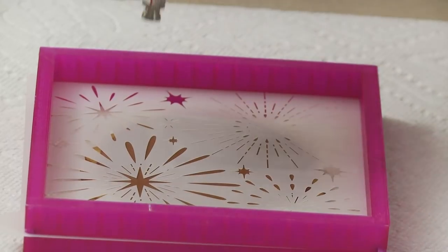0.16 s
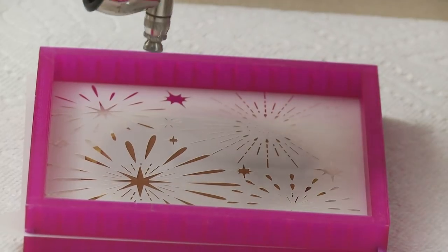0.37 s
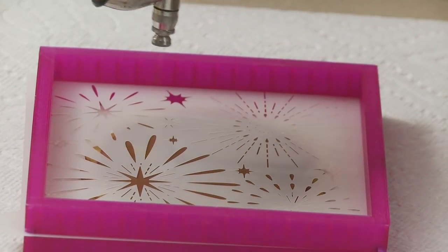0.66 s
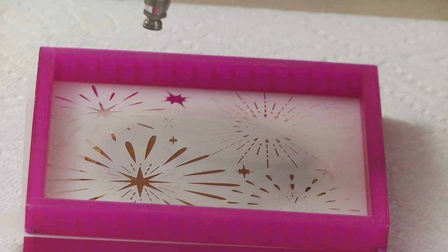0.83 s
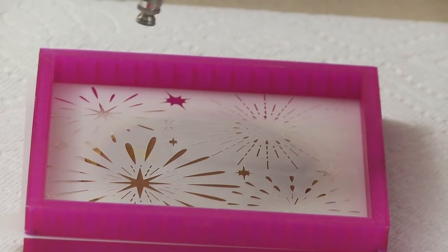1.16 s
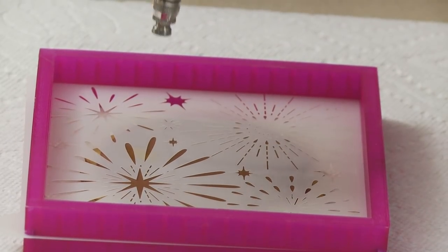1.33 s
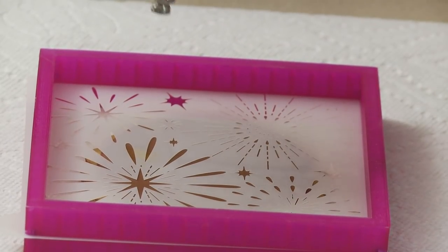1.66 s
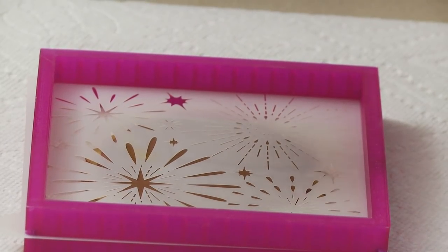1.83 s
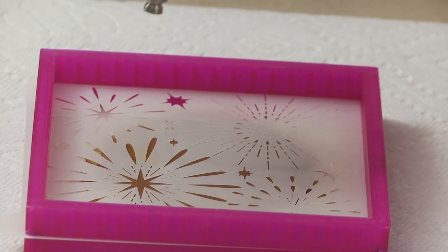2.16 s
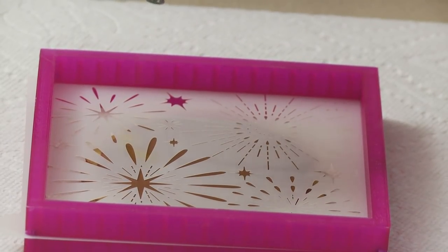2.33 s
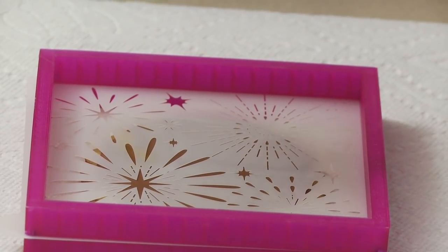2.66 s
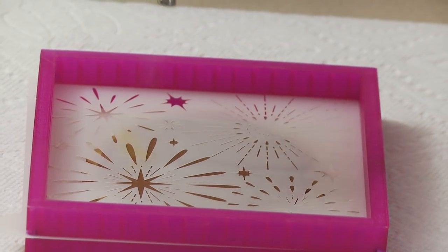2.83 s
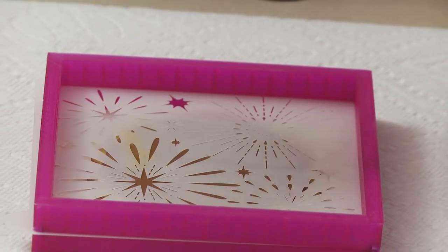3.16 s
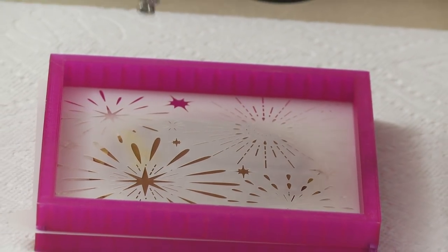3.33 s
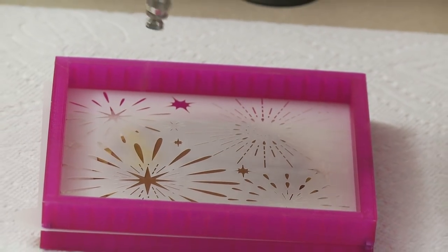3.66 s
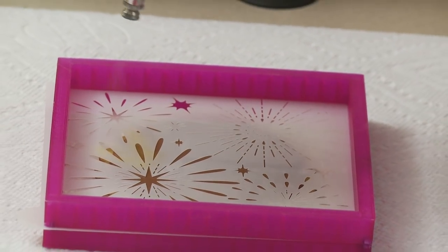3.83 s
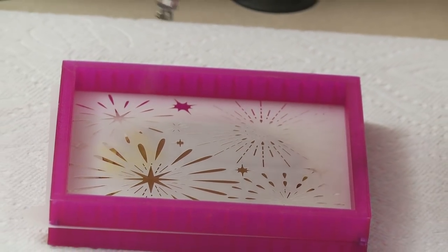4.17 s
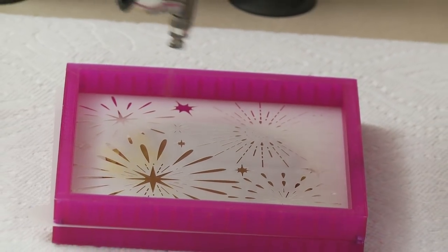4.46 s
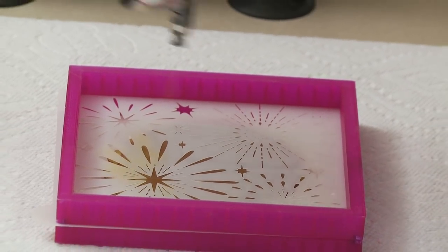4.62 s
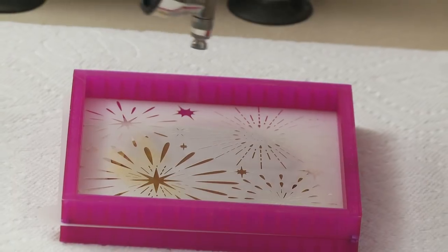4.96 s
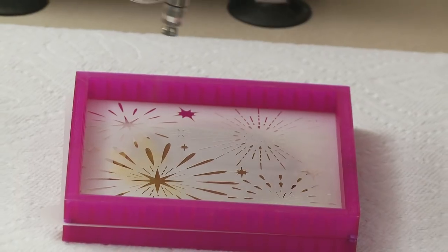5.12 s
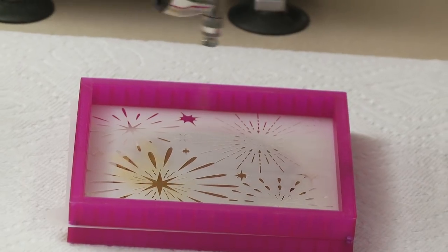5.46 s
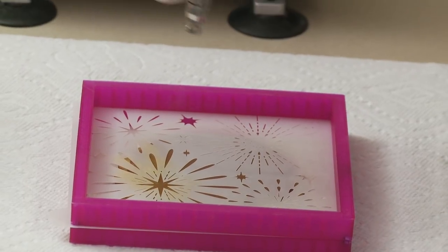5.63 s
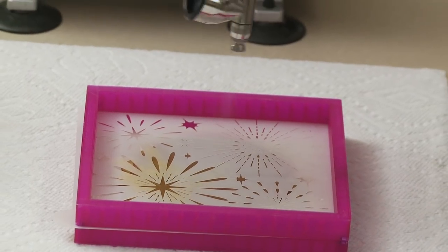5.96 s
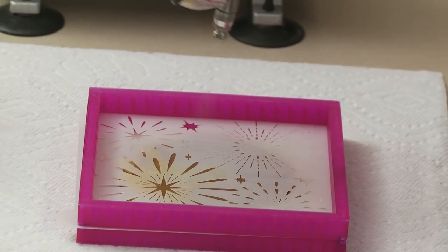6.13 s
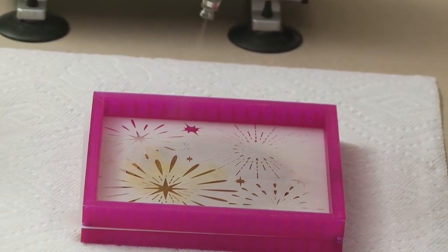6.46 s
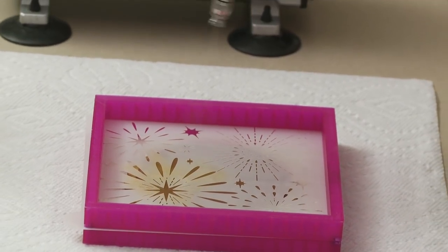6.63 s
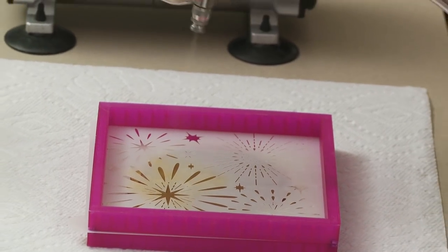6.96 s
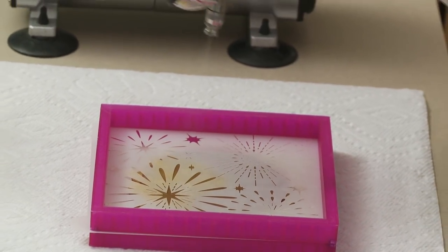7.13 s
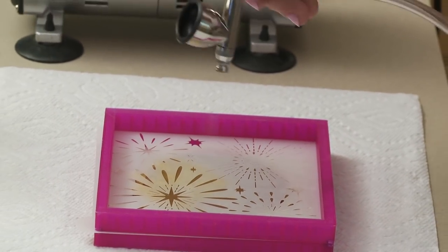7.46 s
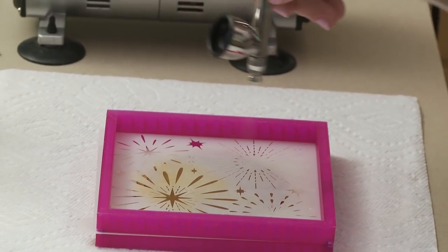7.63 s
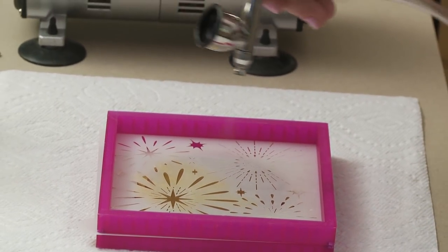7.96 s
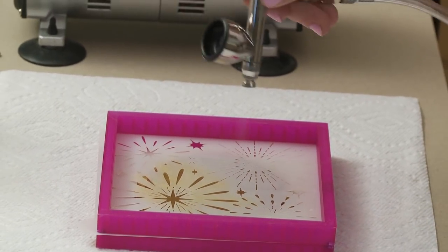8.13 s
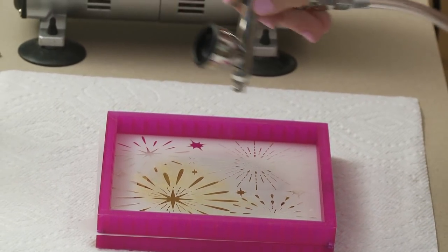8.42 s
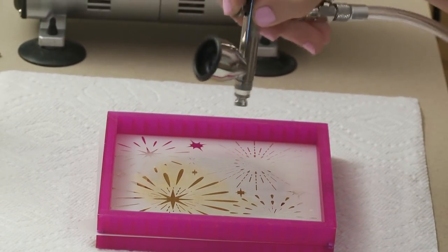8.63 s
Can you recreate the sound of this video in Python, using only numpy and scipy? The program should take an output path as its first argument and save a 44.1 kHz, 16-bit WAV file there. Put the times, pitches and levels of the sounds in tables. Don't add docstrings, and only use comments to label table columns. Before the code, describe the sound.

A small air compressor chugs and hums steadily on a counter while an airbrush hisses close by, its jet swelling as it sweeps a plastic tray.

```python
import sys
import numpy as np
from scipy import signal
from scipy.fft import rfft, irfft, next_fast_len
from scipy.io import wavfile
from scipy.ndimage import uniform_filter1d, map_coordinates

SR = 44100
rng = np.random.default_rng(int(sys.argv[2]) if len(sys.argv) > 2 else 0)


def bounce(signal):
    frames = np.transpose(np.atleast_2d(signal))
    limited = np.clip(frames, -1, 1)
    pcm = np.round(limited * 32767).astype(np.int16)
    wavfile.write(sys.argv[1], SR, pcm)


def ratio(d):
    e = np.asarray(d, float) / 20
    return 10 ** e


N = 387638

SHAFT_HZ = 28.24
VALVE_S = .005
SQUEAL_HZ = 7510


def unit(x):
    return x / np.sqrt(np.mean(x ** 2) + 1e-20)


def along(points, hz):
    f, v = np.transpose(points)
    return np.interp(np.log(hz + 1), np.log(f + 1), v)


def curves(rows):
    s, *cols = np.transpose(rows)
    return [np.interp(np.arange(N) / SR, s, c) for c in cols]


def wobble(rate):
    knots = rng.standard_normal(int(N * rate / SR) + 4)
    return map_coordinates(knots, [np.arange(N) * rate / SR])


def add_db(a_db, b_db):
    return 10 * np.log10(ratio(2 * a_db) + ratio(2 * b_db))


def filtered(x, response):
    m = 2 * next_fast_len(N // 2 + SR // 4)
    return irfft(rfft(x, m) * response(np.fft.rfftfreq(m, 1 / SR)), m)[..., :N]


def causal(db, share, slant):
    cepstrum = irfft(np.log(ratio(db) + 1e-9))
    half = len(cepstrum) // 2
    cepstrum[1:half] *= 2
    cepstrum[half + 1:] = 0
    log = rfft(cepstrum)
    khz = np.linspace(0, SR / 2000, half + 1)
    delay_phase = np.pi * 1000 * slant * khz ** 2
    return np.exp(log.real + 1j * share * log.imag - 1j * delay_phase)


def hiss(spectrum, patchy_db):
    z = signal.stft(rng.standard_normal(N + 512), nperseg=512)[2]
    field = uniform_filter1d(uniform_filter1d(rng.standard_normal(z.shape), 5, 0), 9, 1)
    x = signal.istft(z * ratio(patchy_db * unit(field)), nperseg=512)[1][:N]
    closed = [(spectrum[0][0] / 2, -120), *spectrum, (spectrum[-1][0] * 2, -120)]
    return unit(filtered(x, lambda hz: ratio(along(closed, hz))))


def narrow(centre_hz, width_hz):
    slow = filtered(rng.standard_normal((2, N)), lambda hz: 1 / (1 + (2 * hz / width_hz) ** 2))
    phase = 2 * np.pi * np.cumsum(centre_hz) / SR
    return unit(slow[0] * np.cos(phase) + slow[1] * np.sin(phase))


def bounced(x, ms, strength):
    late = map_coordinates(x, [np.arange(N) - ms * SR / 1000])
    return (x + strength * late) / np.sqrt(1 + strength ** 2)


def strikes(turns, angle, scatter_db):
    at = np.interp(np.arange(int(turns[-1] - angle) + 1) + angle, turns, np.arange(N))
    size = ratio(scatter_db * rng.standard_normal(len(at)))
    whole = at.astype(int)
    first = np.bincount(whole, size * (1 - at % 1), N + 1)
    second = np.bincount(whole + 1, size * (at % 1), N + 1)
    return (first + second)[:N]


def passes(rows, rest_db):
    t = np.arange(0, N / SR, .002)
    squareness = 2.42
    swells = 0
    for s, length, db in rows:
        swells = swells + ratio(2 * db) * np.exp(-np.abs(2 * (t - s) / length) ** squareness)
    return 10 * np.log10(ratio(2 * rest_db) + np.interp(np.arange(N) / SR, t, swells))


def kitchen(x):
    # pitch_hz, decay_s
    die_away = [(200, 0.15), (2500, 0.33), (12000, 0.28)]
    hz, t, z = signal.stft(rng.standard_normal(SR // 2), SR, nperseg=256)
    decay = ratio(-60 * t / along(die_away, hz)[:, None])
    tail = signal.istft(z * decay, SR, nperseg=256)[1]
    return signal.fftconvolve(np.pad(x, (300, 0)), tail / np.linalg.norm(tail))[:N]


def pistons(turns, pressure):
    # shaft_order, level_db
    opposed_orders = [(1, -67.7), (3, -63.3), (5, -55.6), (7, -58.7), (9, -61.8), (11, -63.4), (13, -59.9),
                      (15, -67.4), (17, -62.5), (19, -66.8), (21, -66.4), (23, -64.0), (25, -58.3),
                      (27, -72.2), (29, -62.8), (31, -63.9), (33, -63.0)]
    # shaft_order, level_db
    shared_orders = [(2, -62), (4, -65), (6, -68), (8, -81), (10, -108), (12, -70), (14, -74.5), (16, -81),
                     (18, -69.5), (20, -67), (22, -98), (24, -70.5), (26, -83), (28, -73.5), (30, -67.5),
                     (32, -65), (34, -56)]
    opposed = strikes(turns, .15, scatter_db=.7) - strikes(turns, .65, scatter_db=.7)
    shared = strikes(2 * turns, .75, scatter_db=.4)

    def frame(orders):
        peaks = [(k * SHAFT_HZ, db) for k, db in orders]
        points = [(5, -90), *peaks, (1100, -90), (3000, -130)]
        return lambda hz: causal(along(points, hz), share=0.57, slant=0.00376)

    def tank(f):
        return ratio(-60) * (1j * f * 300 / (620 ** 2 - f * f + 1j * f * 300)) ** 2

    thumps = filtered(opposed, frame(opposed_orders)) + filtered(shared, frame(shared_orders[:-1]))
    thumps = thumps + pressure * filtered(shared, tank)
    return thumps * SR / SHAFT_HZ / np.sqrt(8)


def housing(turns, tone_db, pressure):
    beat_hz, slip_hz = 7.075, 148.298
    t = np.arange(N) / SR
    beat = 2 * np.pi * (beat_hz * t + .32)
    swell = 1 + .11 * np.cos(beat) + .1 * np.cos(2 * beat - 3.2) + .04 * wobble(28)
    sway = 0.26 * np.sin(beat + 0.73) + 0.16 * np.sin(2 * beat + 1.3)
    loose = .02 + .6 * pressure
    starts = (-.3, .27, -.36, .27, -.3)
    levels_db = (-62 + 7 * pressure, *tone_db, -62 + 9 * pressure)
    tone = 0
    for order, start, db in zip(range(34, 39), starts, levels_db):
        phase = 2 * np.pi * (order * turns + start) + sway + loose * wobble(18)
        tone = tone + ratio(db) * np.cos(phase)
    slip = ratio(-57.0) * np.cos(2 * np.pi * (slip_hz * t + 0.31))
    return np.sqrt(2) * (swell * tone + slip)


def valves(turns, pressure):
    # pitch_hz, width_hz, level_db
    plate_modes = [(1289, 43, -2), (1570, 240, -1.5), (1753, 44, 5), (2160, 72, -7.5), (2540, 180, -21)]
    # pitch_hz, level_db per Hz
    tick_spectrum = [(1590, -23), (2700, -8), (2760, 2), (3350, -12), (4580, -3), (6260, -13), (11300, 2.5),
                     (13300, -12), (16000, -40)]
    # pitch_hz, level_db per Hz
    rattle_spectrum = [(12, 12), (40, -4.5), (100, -7.5), (300, -14.5), (880, -11.5), (1020, 0),
                       (1090, -4.5), (1200, -14), (1700, -7), (1900, -19.5), (2600, -28), (4000, -72)]
    blows = strikes(turns, .36, scatter_db=1.2)
    blows = blows + .5 * strikes(turns, .735, scatter_db=1.6)
    blows = blows - .45 * strikes(turns, .59, scatter_db=1.6)

    def padded_plate(f):
        ring = 0
        for k, (c, w, db) in enumerate(plate_modes):
            ring = ring + (-1) ** k * ratio(db) * 1j * f * w / (c * c - f * f + 1j * f * w)
        return ring / (1 + 1j * f / 3000) ** 3

    leak = 0.099 + ratio(-60 * ((turns - .17) % 1) / .7) + 0.33 * ratio(-60 * ((turns - .4) % 1) / 1.1)
    throb = 1 + 0.19 * np.cos(4 * np.pi * (turns - .2))
    clack = ratio(-54.5 + 3.7 * pressure) * unit(filtered(blows, padded_plate))
    tick = ratio(-64.5) * unit(leak * hiss(tick_spectrum, patchy_db=1))
    rattle = ratio(-51.0) * throb * hiss(rattle_spectrum, patchy_db=.5)
    return clack + tick + rattle


def puffs():
    # start_s, peak_db, sign
    steps = [
        (1.895, -48, -1),
        (2.132, -33, 1),
    ]
    t = np.arange(N) / SR
    swings = 0
    for s, db, sign in steps:
        swing = np.sin(2 * np.pi * 36 * (t - s)) * ratio(-60 * np.abs(t - s) / .16)
        swings = swings + sign * ratio(db) * (t > s) * swing
    return swings


def trigger():
    shut_s, open_s = 1.888, 2.131
    t = np.arange(N) / SR
    return np.clip(np.maximum(shut_s - t, t - open_s) / VALVE_S + .5, 0, 1) ** 2


def needle():
    first_s, dry_db = 0.052, -9
    stutter_s, stutter_length_s, stutter_db = .074, .012, -6
    t = np.arange(N) / SR
    still_dry = np.clip((first_s - t) / VALVE_S + .5, 0, 1)
    catch = np.exp(-(2 * (t - stutter_s) / stutter_length_s) ** 2)
    return ratio(dry_db * still_dry + stutter_db * catch)


def droplets():
    # start_s, peak_db
    bursts = [(.1143, -21), (.1165, -23), (.1257, -23), (.129, -26)]
    t = np.arange(N) / SR
    pops = 0
    for s, db in bursts:
        pops = pops + ratio(db) * np.exp(-((t - s) / .00012) ** 2) * np.cos(2 * np.pi * SQUEAL_HZ * (t - s))
    return -pops


def wet_tip():
    # centre_s, length_s, level_db
    squeals = [(.118, 0.049, -36.5), (.15, 0.074, -40)]
    return ratio(passes(squeals, -120)) * narrow(np.full(N, SQUEAL_HZ), width_hz=1400) + droplets()


def gurgle():
    # time_s, pitch_hz, level_db
    rising = [(.03, 1100, -90), (.05, 1150, -51), (.1, 1250, -48), (.16, 1600, -52), (.3, 2100, -52),
              (.45, 2200, -70)]
    spit_hz, spit_db = curves(rising)
    return ratio(spit_db) * narrow(spit_hz, width_hz=900)


def drifting_mist():
    # pitch_hz, level_db per Hz
    mist_spectrum = [(2400, -13), (3900, -0.5), (5000, -11), (6800, -4.5), (8500, 3)]
    return ratio(-60 + wobble(5)) * hiss(mist_spectrum, patchy_db=2.5)


def tray_splash(splash_db, flutter):
    # pitch_hz, level_db per Hz
    splash_spectrum = [(300, -22), (600, -11.5), (780, -12), (1500, -9), (2050, -6), (2480, -14.5),
                       (2800, -4.5), (3300, -3), (3900, -6), (4080, -12.5), (4280, -2), (4600, 0.5),
                       (5600, 0), (6400, -4), (7000, -21), (9000, -12)]
    level_db = splash_db + 0.98 * wobble(14) + flutter + 0.42 * wobble(120)
    return ratio(level_db) * hiss(splash_spectrum, patchy_db=0.68)


def needle_cap():
    # time_s, pitch_hz, level_db
    ringing = [(0, 10600, -60), (.12, 10500, -44), (.33, 10810, -46), (.45, 10700, -68), (3, 11250, -60),
               (3.3, 11030, -52), (4.2, 10600, -52), (5.6, 10160, -56), (7, 9670, -58.5), (8.79, 9930, -62)]
    cap_hz, cap_db = curves(ringing)
    return ratio(cap_db + 2 * wobble(8)) * narrow(cap_hz + 120 * wobble(5), width_hz=700)


def nozzle(rest_db, facing_db, counter_ms, splash_db):
    # pitch_hz, level_db per Hz
    middle_spectrum = [(2200, -34), (3000, -22), (4500, -12), (6500, -2), (8000, 0), (9500, 0), (11000, -3),
                       (12500, -12), (14000, -30)]
    # pitch_hz, level_db per Hz
    top_spectrum = [(9500, -30), (10600, -8), (13000, -5), (13800, 0), (15800, 0), (17000, 0)]
    # centre_s, length_s, level_db
    clearings = [(.12, 0.045, -36.5), (.24, 0.16, -45), (4.75, 0.072, -46), (6.2, .05, -50)]
    # centre_s, length_s, whistle_db
    wrist_turns = [(2.17, .1, -46), (2.89, .12, -44), (4.21, .14, -39), (4.43, .09, -39), (4.62, .22, -40),
                   (4.94, 0.13, -41), (5.21, 0.14, -42.5), (6.07, 0.07, -46), (6.67, 0.12, -42),
                   (7.15, .1, -42), (8.1, .16, -45), (8.33, 0.13, -42)]
    facing_share = 0.23
    middle_free_db = -47.5 + facing_share * facing_db + 0.67 * wobble(7.6)
    middle_db = add_db(passes(clearings, middle_free_db), splash_db - 11)
    muffled_db = 0.63 * np.clip(rest_db + 51.5, 0, 9)
    whistle_free_db = -44.5 + facing_share * facing_db - muffled_db + 1.5 * wobble(9)
    whistle_db = add_db(passes(wrist_turns, whistle_free_db), splash_db - 10.5)
    top_db = -47.5 + facing_db + 0.8 * wobble(6)
    middle = ratio(middle_db) * bounced(hiss(middle_spectrum, patchy_db=2), counter_ms, strength=.45)
    whistle = ratio(whistle_db - 2.5) * narrow(12400 + 200 * wobble(6), width_hz=2000)
    top = ratio(top_db + 3) * hiss(top_spectrum, patchy_db=2.4)
    return middle + whistle + needle_cap() + top


def airbrush():
    # time_s, splash between passes rest_db, facing the microphone facing_db,
    # bounce off the counter counter_ms, bounce off the tray rim rim_strength (0-1)
    hand = [(0, -50, -5, .158, 0), (.06, -39, 0, .158, .1), (.22, -46, 5, .158, 0), (.5, -49, 0.5, .158, 0),
            (1.7, -48, -2, .158, 0), (2.3, -49, 5, .156, 0), (2.6, -47.5, 0.5, .156, 0.1),
            (2.92, -49, 3, .158, 0.2), (3, -50.5, -0.5, .158, 0.24), (3.7, -48, -0.5, .158, 0),
            (4.5, -52, 2.5, .16, 0.33), (5.4, -55, -0.5, .17, 0.2), (5.95, -61, -2, .187, 0),
            (6.1, -56.5, 2.5, .189, .25), (6.9, -58.5, 3, .189, 0), (7.5, -54.5, 1, .185, 0),
            (8.2, -55, 0.5, .178, 0.06), (8.79, -64, -2, .165, 0.2)]
    # centre_s, length_s, splash_db
    sweeps = [(.14, .1, -40), (.28, 0.22, -39), (.62, 0.15, -38.5), (.95, 0.14, -42), (1.26, 0.086, -38.5),
              (1.57, 0.15, -38.5), (1.85, 0.14, -41), (2.22, 0.21, -35.5), (2.4, 0.16, -37.5),
              (2.73, 0.11, -41.5), (2.87, .11, -39.5), (3.17, 0.12, -42), (3.38, 0.21, -39.5),
              (3.64, 0.16, -35), (3.88, 0.17, -36), (4.06, 0.16, -43), (4.33, 0.11, -47.5),
              (4.6, 0.32, -53), (4.77, .08, -50), (4.91, .1, -52), (5.19, .1, -50), (5.45, 0.055, -45),
              (5.68, 0.077, -49.5), (6.52, 0.13, -52.5), (6.8, 0.12, -47), (7.02, 0.12, -48),
              (7.26, 0.094, -51), (8.23, 0.16, -48), (8.45, 0.13, -46.5), (8.73, 0.15, -46)]
    rest_db, facing_db, counter_ms, rim = curves(hand)
    splash_db = passes(sweeps, rest_db)
    flutter = .5 * wobble(30)
    on_tray = tray_splash(splash_db, flutter) + drifting_mist()
    rim_ms = .41 + .012 * wobble(4)
    from_nozzle = bounced(nozzle(rest_db, facing_db, counter_ms, splash_db), rim_ms, np.clip(rim, 0, 1))
    jet = needle() * on_tray + wet_tip() + ratio(flutter) * from_nozzle
    return trigger() * jet + gurgle()


def scene():
    # time_s, lag_turns
    shaft_lag = [(0, -.009), (.8, -.0075), (1.88, -.0075), (1.97, -.01), (2.15, -.019), (2.45, -.009),
                 (3.1, -.001), (4.2, .0005), (8.79, .0005)]
    # time_s, level_db
    singing = [(0, -49.5), (.8, -46.8), (1.88, -46), (1.93, -43), (1.98, -51.5), (2.13, -42), (2.27, -47),
               (2.36, -49), (2.6, -49.5), (3.1, -49), (3.6, -46.5), (5, -46.5), (6.3, -45), (7, -45),
               (7.6, -47), (8.79, -46.5)]
    # time_s, excess (0-1)
    tank_pressure = [(0, 0), (1.89, 0), (2.0, .8), (2.13, 1), (2.45, .8), (2.75, .4), (3.1, 0), (8.79, 0)]
    (lag,), (hum_db,), (pressure,) = curves(shaft_lag), curves(singing), curves(tank_pressure)
    tone_db = hum_db, -49.4 - 8 * pressure, hum_db + 1.3 - 6 * pressure
    turns = SHAFT_HZ * np.arange(N) / SR + lag
    motor = pistons(turns, pressure) + housing(turns, tone_db, pressure) + valves(turns, pressure)
    air = airbrush()
    mono = motor + air + ratio(-16.5) * kitchen(air) + puffs()
    return np.array([mono, mono])


def roll_off(x):
    return signal.sosfilt(signal.butter(12, 16830, fs=SR, output="sos"), x)


def record(dry):
    # pitch_hz, level_db per Hz
    self_noise = [(1500, -10), (3000, 0), (6000, -4), (9000, -1), (14000, -1), (16000, -5)]
    edge_hz = 15730
    noisy = dry + ratio(-67) * hiss(self_noise, patchy_db=.3)
    limited = filtered(noisy, lambda hz: ratio(-np.clip(hz - edge_hz, 0, 200) / 2))
    return roll_off(limited)


dry = scene()
out = record(dry)
bounce(out)
```